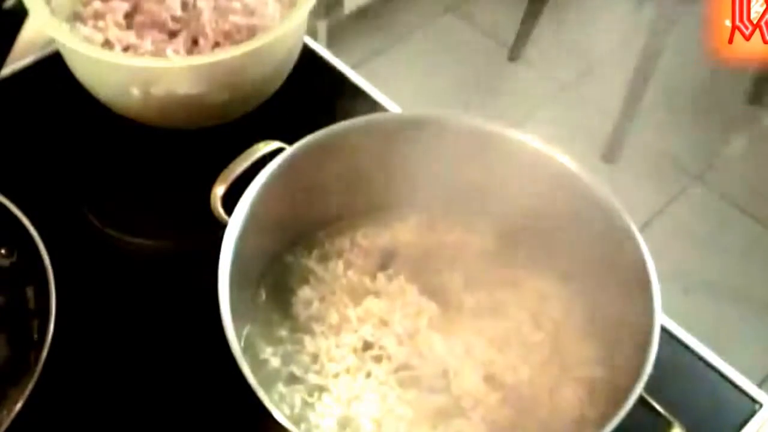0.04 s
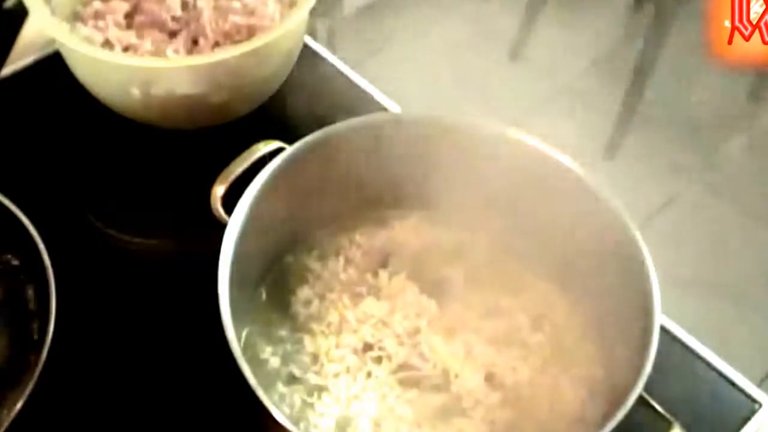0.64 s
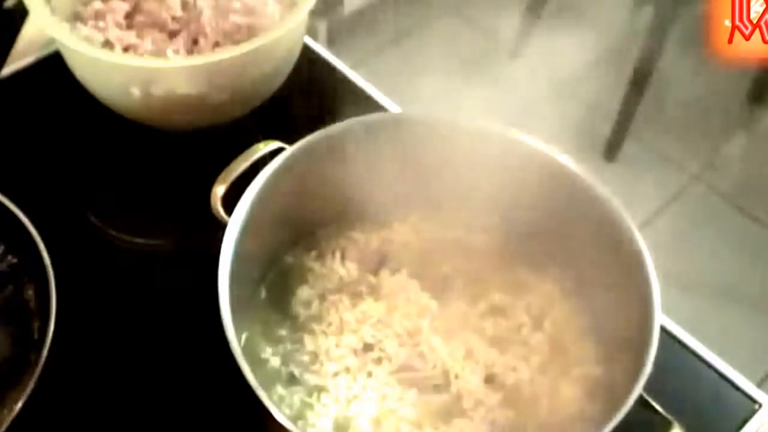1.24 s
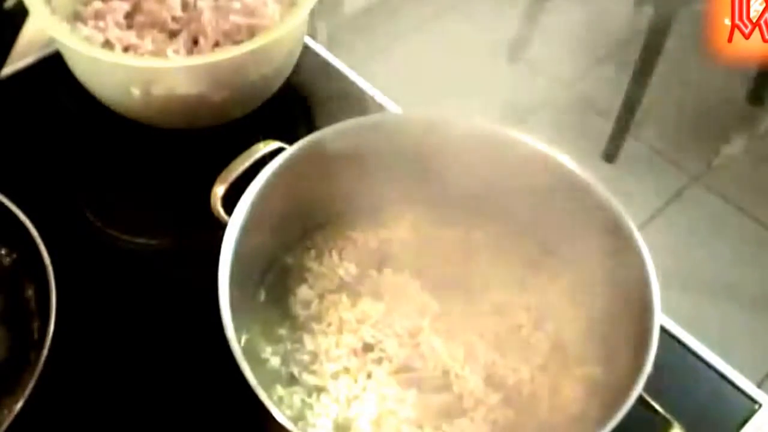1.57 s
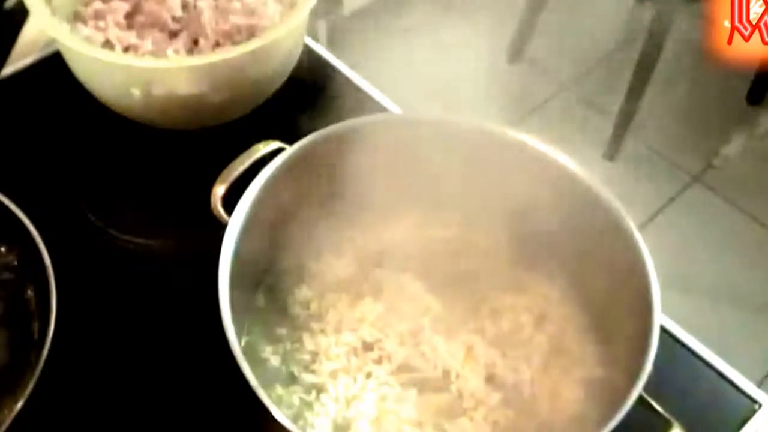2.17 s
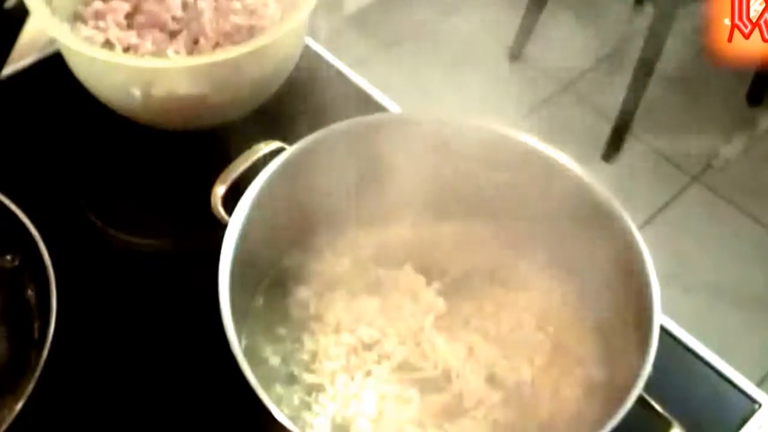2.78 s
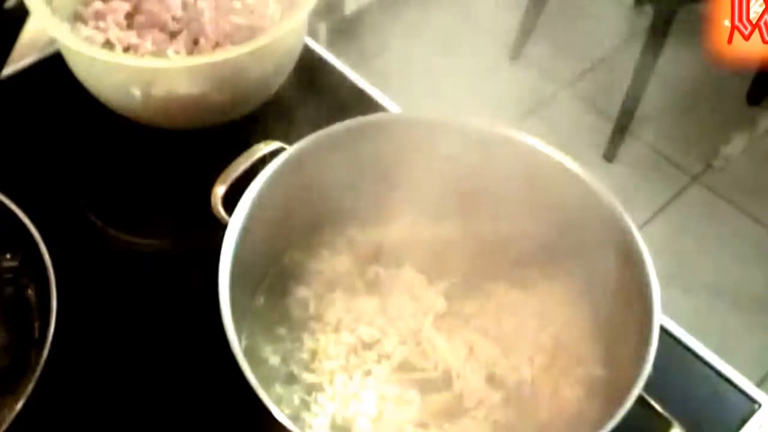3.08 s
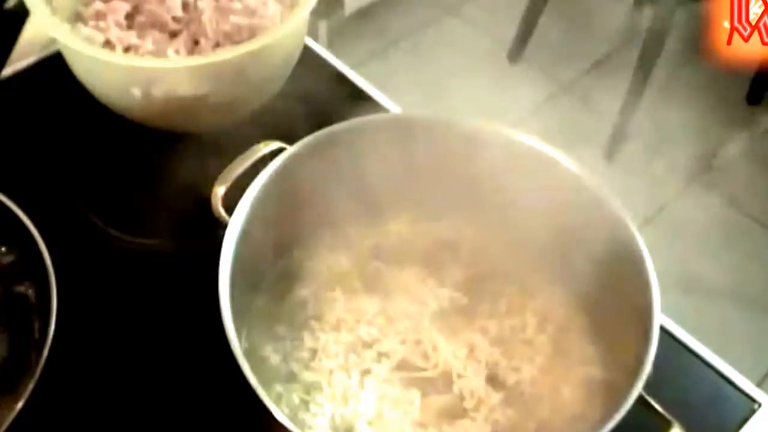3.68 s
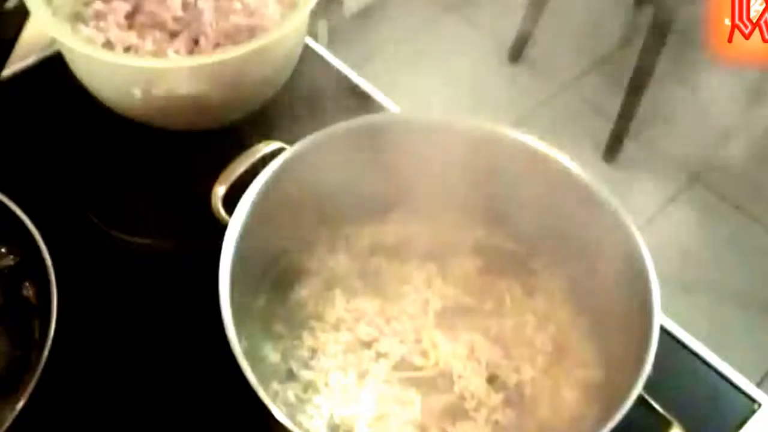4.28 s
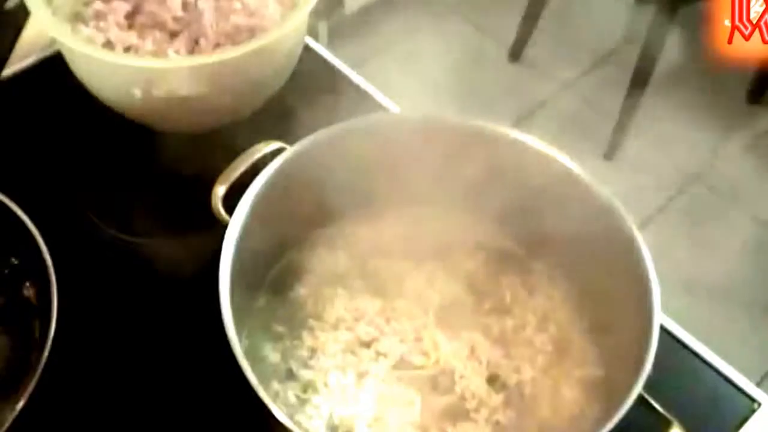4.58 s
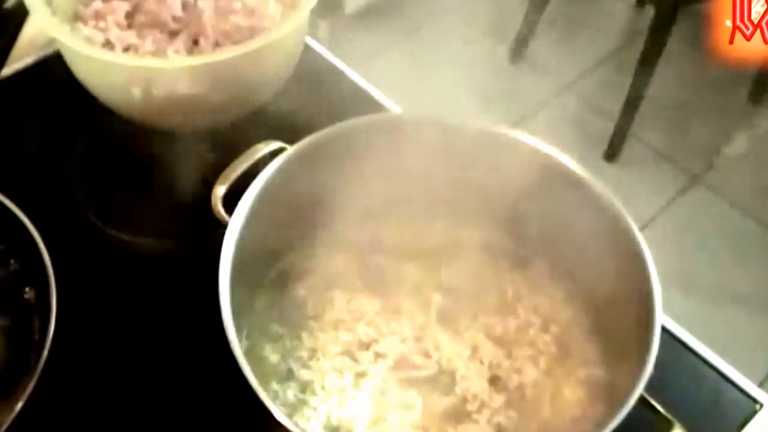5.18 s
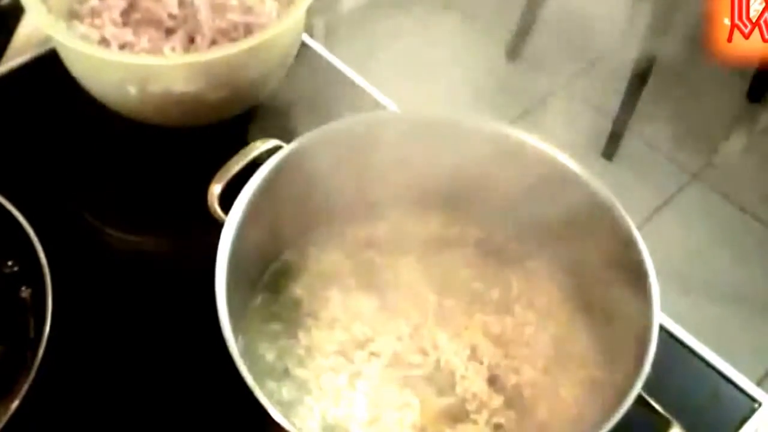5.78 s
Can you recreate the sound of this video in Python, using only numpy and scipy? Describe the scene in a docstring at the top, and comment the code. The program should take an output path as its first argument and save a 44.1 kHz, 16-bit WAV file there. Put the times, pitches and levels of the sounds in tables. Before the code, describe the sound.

Noodle soup simmers in an open steel pot on a kitchen stove, heard from just above the rim for about six seconds. Small bubbles burst continuously over a fine fizz, while larger, short wet pops stand out irregularly and ring slightly inside the pot. The pops are thickest in the first second, cluster again around 2 and 3.2 seconds, and two stronger ones land near 4 seconds. Droplets snap with sharp, bright ticks at about 1.5 and 4.3 seconds, and brief, faint sizzles come off the hot steel, mostly between 1.5 and 2.3 seconds. A low fan-like hum drones underneath throughout. A dull, muffled rush swells softly from about 4.3 to 4.9 seconds and again at 5.5. Very faintly, something ticks like a small clock, thin and high, about three times a second. The bubbling continues to the end.

```python
"""Noodle soup simmers in an open steel pot on a kitchen hob, heard from just above the rim.
Bubbles burst in short chirps that ring in the air of the pot, over a fine fizz of tiny ones.
Droplets snap in a few sharp spits and sizzle off the hot steel. A low hum drones underneath,
a dull rush comes in swells near the end, and something ticks faintly like a small clock."""
import sys
import numpy as np
from scipy import signal
from scipy.fft import rfft, irfft, next_fast_len
from scipy.io import wavfile

SR = 44100
rng = np.random.default_rng(int(sys.argv[2]) if len(sys.argv) > 2 else 0)


def generate_wav(signal):
    """Clip the signal to [-1, 1] and save it as 16-bit WAV at the path in sys.argv[1]."""
    frames = np.transpose(np.atleast_2d(signal))
    scaled = np.clip(frames, -1, 1) * 32767
    pcm = np.round(scaled).astype(np.int16)
    wavfile.write(sys.argv[1], SR, pcm)


N = 261424
POP_CREST_S = .00095  # from the snap of a large bubble's film to its crest

# the big foreground pops: crest t/s, level/dB, f/Hz
POPS = [(0.0213, -0.5, 1580), (0.0495, -3.5, 2930), (0.0783, -8, 2000), (0.174, -12.5, 5430),
        (0.2337, -13.0, 5600), (0.3638, -7, 1890), (0.371, -8, 1960), (0.3984, -6, 1680), (0.418, -6, 3500),
        (0.4251, -6, 1550), (0.4483, -7.5, 2580), (0.4582, -7.5, 1660), (0.4665, -7.5, 2370),
        (0.4993, -7, 2760), (0.5016, -7.5, 1660), (0.5213, -6.5, 1890), (0.5605, -2.5, 1930),
        (0.5825, -6.5, 2410), (0.5863, -10.0, 5600), (0.6165, -4.5, 1900), (0.6522, -8, 2450),
        (0.6637, -2.5, 1830), (0.6769, -8, 1770), (0.6998, -5, 2930), (0.7152, -6, 2250),
        (0.7247, -5.5, 1890), (0.7342, -3.5, 2070), (0.7555, -7.5, 3200), (0.7584, -9.0, 5600),
        (0.7798, -6, 1660), (0.789, -7, 1450), (0.8355, -1.5, 1620), (0.8727, -6, 2760),
        (0.9172, -2.5, 1640), (0.921, -7.5, 2600), (0.9489, -8, 2110), (1.0415, -6.0, 2200),
        (1.0776, -7, 1720), (1.0951, -11.0, 5110), (1.1393, -6, 1660), (1.1957, -6.5, 5600),
        (1.1979, -2.5, 1890), (1.2301, -9.5, 5430), (1.3403, -2.5, 1710), (1.4454, -7.5, 2780),
        (1.4648, -7.5, 1460), (1.7477, -6.5, 2900), (1.7565, -7.5, 1550), (1.7814, -6.5, 5270),
        (1.8625, -6, 1420), (1.8895, -7.5, 2670), (1.9342, -3, 1520), (1.9608, -7, 2600),
        (1.9683, -5.5, 1660), (1.9735, -6.5, 1600), (2.1067, -11.0, 1380), (2.1609, -6, 2670),
        (2.1886, -10.5, 1380), (2.2102, -7.5, 2710), (2.226, -8.0, 3440), (2.2617, -6.5, 2100),
        (2.2797, -7.5, 2540), (2.286, -4, 1290), (2.4998, -4, 2700), (2.5366, -8.5, 3440),
        (2.6937, -8, 2320), (2.7889, -6.5, 2000), (2.9288, -7.5, 3440), (2.9733, -6.5, 1560),
        (3.025, -9.5, 1230), (3.0822, -7, 2330), (3.1058, -7.5, 1530), (3.1209, -10.0, 4530),
        (3.1291, -8, 1310), (3.1727, -3.5, 1870), (3.2003, -3, 1200), (3.212, -7, 1350),
        (3.2269, -3.5, 2560), (3.241, -8, 1400), (3.253, -9, 1150), (3.2745, -6.5, 1480), (3.285, -8, 1750),
        (3.3713, -4.8, 1920), (3.4069, -7.5, 1600), (3.4399, -5.5, 2740), (3.5308, -6.5, 1920),
        (3.5377, -7, 2040), (3.6161, -5.5, 1950), (3.6622, -11.0, 5600), (3.7208, -6.5, 2620),
        (3.7848, -6.5, 2540), (3.8922, -1, 2480), (3.9965, -7, 2390), (4.0118, -9.0, 3890),
        (4.0574, -7, 1730), (4.1076, -9.5, 1380), (4.1166, -8, 2950), (4.1485, -0.3, 1580),
        (4.376, -7.5, 2750), (4.4123, -5.5, 1640), (4.4128, -7, 3140), (4.441, -7, 1700), (4.467, -8, 2850),
        (4.499, -8.5, 2050), (4.6269, -4.5, 1920), (4.6945, -7.5, 3150), (4.6976, -10.5, 1120),
        (4.761, -7, 3380), (4.8237, -4.5, 2000), (4.997, -11, 1900), (5.1673, -5, 2620),
        (5.2624, -7.5, 2800), (5.339, -7, 2900), (5.4096, -4.5, 1450), (5.4205, -6.5, 2500),
        (5.4317, -7.5, 1530), (5.4988, -11, 1220), (5.5722, -8, 2500), (5.6192, -8, 2150),
        (5.6803, -4.5, 1520), (5.709, -8.5, 2450), (5.7582, -10.0, 4670), (5.7886, -5, 2660),
        (5.832, -7.5, 2550), (5.8392, -5.5, 2320), (5.8471, -8, 1460), (5.8973, -8.5, 2390)]
def pops(level_db=-1.0, neighbours=4, spray_db=-12.5, spray_lag_s=.007, spray_hz=2450, octaves=0.8):
    """Large bubbles burst, each at its own spot, and tear open small neighbours in a dry crackle."""
    out = np.zeros((2, N))
    small = [pop(hz) for hz in spray_hz * 2 ** (octaves * np.linspace(-1, 1, 24))]
    for s, db, hz in POPS:
        cluster = np.zeros((1, SR // 20))
        add(cluster, 0, pop(hz)[None])
        kinds = rng.integers(len(small), size=neighbours)
        for kind, lag in zip(kinds, rng.exponential(spray_lag_s, neighbours)):
            add(cluster, 2 * POP_CREST_S + lag, amp(spray_db) * small[kind][None])
        echo = pot_echo(wall_db=-9.5, ring_db=6.0, wall_same=0.44, room_db=-10.0)
        add(out, s - POP_CREST_S, amp(db + level_db) * signal.fftconvolve(cluster, echo, axes=1))
    return out


def pop(hz, crest_s=POP_CREST_S, ring_s=.00062, glide=-.08, snap_db=-8., snap_s=.00035):
    """The film snaps, then the cavity swells, sags in pitch and dies within a few cycles."""
    t = np.arange(SR // 100) / SR
    swell = np.where(t < crest_s, np.sin(np.pi / 2 * t / crest_s), 1 / np.cosh((t - crest_s) / ring_s))
    turns = np.cumsum(hz * (1 + glide * np.tanh(t / crest_s - 1))) / SR + rng.random()
    snap = t / snap_s * np.exp(1 - t / snap_s) * film_noise(1990, 4450)[:len(t)]
    sound = swell * np.sin(2 * np.pi * turns) + amp(snap_db) * np.sqrt(2) * snap / abs(snap).max()
    return signal.lfilter(*signal.butter(5, 6500, fs=SR), sound)


def film_noise(low_hz, high_hz):
    """The rasp of a tearing film: a short band of noise."""
    band = signal.butter(6, [low_hz, high_hz], "band", fs=SR)
    return unit(signal.lfilter(*band, rng.standard_normal(2048)))[256:]


# fader ride for how hard the soup bubbles: t/s, level/dB
BOIL = [(0, -21.5), (0.29, -24), (0.41, -19.5), (0.6, -22), (0.74, -19.5), (0.82, -23), (0.92, -20),
        (1.12, -24), (1.26, -23.5), (1.66, -24), (1.95, -23), (2.07, -26.5), (2.27, -19.5), (2.43, -24),
        (2.85, -23), (3.24, -22), (3.33, -26), (3.47, -19.5), (3.82, -25.5), (4.0, -21.5), (4.33, -23),
        (4.42, -20), (4.56, -27.5), (4.64, -22), (5.05, -25.5), (5.42, -21.5), (5.66, -27.5), (5.93, -26)]
def simmer(plips_db=-6.5, bubbles_db=-1.2, fizz_db=-26, fizz_follow=0.054, fall_db_per_s=0.32):
    """Plips and a bed of mid-sized bubbles ride the boil; the steadier fizz slowly dies down."""
    boil_db = over_time(BOIL)
    stirred = flurry(strength_db=2.5, lag_s=.004)
    plips = swarm(2780, 5710, per_s=220, spread_db=3.5, wall_db=2.5, wall_same=0.92, kinds=14)
    bubbles = swarm(927, 3370, per_s=480, spread_db=2.5, wall_db=-2.5, wall_same=0.37, kinds=24)
    fizz = swarm(3220, 9860, per_s=600, spread_db=3.5, wall_db=-6.0, wall_same=0.45, kinds=24)
    fizz_ride_db = fizz_db + fizz_follow * (boil_db - boil_db.mean()) - fall_db_per_s * np.arange(N) / SR
    body = amp(plips_db) * plips + amp(bubbles_db) * stirred * bubbles
    return amp(boil_db) * body + amp(fizz_ride_db) * stirred ** 0.19 * treble_flicker(fizz)


# EQ on the bed of small bubbles: f/Hz, level/dB
BUBBLE_EQ = [(400, -39), (850, -3), (1100, -3), (1400, -2.5), (2000, 0.5), (2700, -0.5), (3300, -4),
             (4100, -8.5), (5600, -7), (6500, -6), (8000, -15.5), (10800, -48.5), (12000, -46),
             (16000, -51)]
def swarm(low_hz, high_hz, per_s, spread_db, wall_db, wall_same, kinds):
    """Small bubbles of several pitches burst in the pot at random moments and strengths."""
    out = np.zeros((2, N))
    for hz in np.linspace(low_hz, high_hz, kinds):
        moment, size, sign = rng.random((400, 3))[:int(per_s * N / SR / kinds)].T
        strength = amp(spread_db * np.minimum(-np.log(size), 3.5))
        triggers = np.zeros(N)
        triggers[(moment * N).astype(int)] = np.sign(sign - .5) * strength
        chirp = burst(hz, swell_cycles=1.8, glide=0.18)
        echo = pot_echo(wall_db, ring_db=17.0, wall_same=wall_same)
        sound = signal.fftconvolve(chirp[None] / np.linalg.norm(chirp), echo, axes=1)
        out += signal.oaconvolve(triggers[None], sound, axes=1)[:, :N]
    return unit(shaped(out, lambda hz: amp(at_hz(BUBBLE_EQ, hz))))


def burst(hz, swell_cycles, glide, rasp_db=-11.0):
    """A small bubble rings a few raspy cycles, rising in pitch as it tears open."""
    age = np.arange(int(6 * swell_cycles * SR / hz) + 2) * hz / SR / swell_cycles  # 1 at the crest
    swell = age * np.exp(1 - age)
    pitch = hz * (1 + glide * np.tanh(age - 1))
    ring = swell ** 3 * np.sin(2 * np.pi * (np.cumsum(pitch) / SR + rng.random()))
    return ring + amp(rasp_db) * swell * np.resize(film_noise(1420, 5700), len(age))


def flurry(strength_db, lag_s):
    """Each big pop sets off its neighbours a moment later: a gain on the small bubbles."""
    s, db, _ = np.transpose(POPS)
    jolts = np.bincount((s * SR).astype(int), amp(db + strength_db) ** 2, N)
    age = np.arange(SR // 5) / SR / lag_s
    return unit(np.sqrt(1 + signal.oaconvolve(jolts, age * np.exp(1 - age))[:N]))


def treble_flicker(hiss, above_hz=6730.0, depth_db=6.5, rate_hz=17.0, level_db=-0.5):
    """A random level flicker on the hiss above about 6.7 kHz."""
    top = shaped(hiss, lambda hz: 1 - 1 / (1 + (hz / above_hz) ** 20))
    return hiss - top + amp(level_db) * unit(amp(depth_db * waver(rate_hz))) * top


# ringing modes of the air in the pot: f/Hz, t60/s, level/dB
POT_MODES = [(962.6, 0.1, -10), (1118, 0.11, -36), (1398, 0.054, -10.5), (1695, 0.047, -12),
             (1745, 0.24, -17), (1836, 0.079, -15), (2118, 0.047, -17), (2380, 0.026, -17),
             (2627, 0.046, -12), (2840, 0.022, -16.5), (3160, 0.22, -27)]
def pot_echo(wall_db, ring_db, wall_t60=0.053, wall_same=0.61, room_db=-6.0, room_t60=0.4, bounce=0.32):
    """Stereo impulse response from one spot on the soup: direct sound, steel walls, pot air, kitchen."""
    t = np.arange(SR // 5) / SR
    taps = rng.standard_normal((5, len(t))) * (rng.random((5, len(t))) < .25)
    wall_taps = np.sqrt(wall_same) * taps[0] + np.sqrt(1 - wall_same) * taps[1:3]  # centre plus width
    walls = wall_taps * amp(-60 * t / wall_t60) * (t > .0018)
    room = taps[3:] * amp(-60 * t / room_t60) * (t > .008)
    echo = (amp(wall_db) * unit(walls) + amp(room_db) * unit(room)) / np.sqrt(len(t))
    for hz, t60, db in POT_MODES:  # each spot drives the modes by its own amounts
        ring = amp(-60 * t / t60) * np.sin(2 * np.pi * (hz * t + rng.random()))
        echo += amp(ring_db + db) * rng.uniform(0.51, 2.15) * ring * 2 * np.log(1000) / (t60 * SR)
    echo[:, 0] += 1
    echo[:, int(rng.uniform(.0018, .0028) * SR)] += bounce  # the round wall focuses one clear reflection
    return echo


# sharp droplet accents: crest t/s, level/dB, f/Hz
SPITS = [(1.544, 4, 8400), (2.0805, -23, 6500), (4.2462, -6, 10100), (4.253, 1, 9550)]
def spits(level_db=-13.0, swell_cycles=3.1, glide=0.057):
    """Tiny droplets snap with a bright tick that echoes in the pot."""
    out = np.zeros((2, N))
    for s, db, hz in SPITS:
        snap = burst(hz, swell_cycles, glide)
        echo = pot_echo(wall_db=-7.0, ring_db=-5., room_db=-5.5)
        add(out, s - swell_cycles / hz, amp(db + level_db) * signal.fftconvolve(snap[None], echo, axes=1))
    return out


# brief sizzles: peak t/s, level/dB, centre f/Hz, rise and fade time constant/s
SIZZLES = [(1.08, -44, 9600, 0.067), (1.59, -37, 9150, 0.16), (1.78, -28, 4840, 0.011),
           (1.84, -44, 9800, 0.045), (2.083, -26.5, 6600, 0.029), (2.286, -27, 4400, 0.037),
           (2.76, -47.5, 8600, 0.3), (3.38, -42, 9900, 0.036), (4.252, -30, 9000, 0.036),
           (5.87, -42, 8400, 0.053)]
def sizzles(width_hz=1800.0, flutter_db=3.0, flutter_hz=35., per_s=2100.0, spread_db=-1.5):
    """Droplets boil off the hot steel in short sprays of tiny snaps."""
    t, out = np.arange(N) / SR, np.zeros((2, N))
    for s, db, centre_hz, fade in SIZZLES:
        triggers = rng.random(N) < per_s / SR
        strength = amp(spread_db * np.minimum(rng.exponential(1, N), 3))
        snaps = triggers * strength * rng.standard_normal((2, N))
        spray = shaped(snaps, lambda hz: np.exp(-((hz - centre_hz) / width_hz) ** 4))
        out += amp(db) * np.exp(-abs(t - s) / fade) * unit(spray * amp(flutter_db * waver(flutter_hz)))
    return out


# broad body of the hum: f/Hz, level/dB
HUM_BODY = [(8, -12), (35, -5), (85, -4.5), (170, -9), (205, -1), (260, 2.5), (310, -3.5), (405, -1),
            (500, -11), (650, -11.5), (850, -16), (1100, -15.5), (1500, -26), (4000, -22), (9000, -57),
            (14000, -75)]
# resonant peaks of the hum: f/Hz, width/Hz, level/dB
HUM_PEAKS = [(59.8, 9.6, 0.5), (107.3, 11.8, 6), (138.2, 8.4, 12.5), (157.6, 37, 5.5), (179, 10, 5),
             (286, 24, -7.5), (329.7, 8.1, 4.5), (377.6, 3.7, 3.5), (581, 14.5, -5.5), (717, 1.9, -23),
             (761, 13.5, -7)]
# fader ride on the hum: t/s, level/dB
HUM_RIDE = [(0, -17.5), (.75, -18.5), (1.06, -16.5), (1.3, -18), (2.5, -18.5), (3.4, -17.5), (4.75, -17),
            (5.15, -18), (5.4, -17), (5.93, -18)]
def hum(waver_db=0.8, waver_hz=6.4):
    """A fan-like drone, wavering slightly: turbulent air in a few low resonances."""
    def gain(hz):
        peaks = sum(amp(db) ** 2 / (1 + ((hz - f) / width * 1.64) ** 2) ** 2
                    for f, width, db in HUM_PEAKS)
        return np.sqrt(amp(at_hz(HUM_BODY, hz)) ** 2 + peaks)
    return amp(over_time(HUM_RIDE) + waver_db * waver(waver_hz)) * low_noise(gain)


# dark EQ on the rush: f/Hz, level/dB
RUSH_EQ = [(60, -41), (220, 10), (400, 10), (520, 7), (750, 5.5), (880, -2), (1130, 3), (1300, 3.5),
           (1600, -17), (4000, -61), (12000, -72)]
# swells of the rush: peak t/s, level/dB, rise and fade time constant/s, hollow f/Hz
RUSH_SWELLS = [(4.32, -20, 0.064, 724), (4.48, -24, 0.1, 707), (4.70, -16.8, 0.035, 710),
               (4.754, -16, 0.063, 740), (4.89, -20.5, 0.055, 726), (5.495, -16.5, 0.064, 620)]
def rush(roll_db=2.5, roll_hz=30., hollow_db=4.0, hollow_width_hz=84.0):
    """A dull, rolling rush of noise in a few swells, each with a hollow resonance."""
    t, out = np.arange(N) / SR, np.zeros((2, N))
    noise = low_noise(lambda hz: amp(at_hz(RUSH_EQ, hz)))
    for s, db, fade, hz in RUSH_SWELLS:
        body = np.roll(noise, rng.integers(N), axis=1)
        hollow = signal.lfilter(*signal.iirpeak(hz, hz / hollow_width_hz, fs=SR), body)
        out += amp(db) * np.exp(-abs(t - s) / fade) * unit(body + amp(hollow_db) * hollow)
    return out * amp(roll_db * waver(roll_hz))


# stereo image of the hum and the rush: f/Hz, left-right correlation/0-1
CORRELATION = [(30, 0.92), (130, 1), (300, 0.99), (600, 0.91), (1200, 0.98), (4000, 0.23)]
def low_noise(gain):
    """Coloured stereo noise, nearly mono in the bass and wide on top."""
    left, other = rng.standard_normal((2, N))
    same = lambda hz: np.clip(at_hz(CORRELATION, hz), 0, 1)
    right = shaped(left, same) + shaped(other, lambda hz: np.sqrt(1 - same(hz) ** 2))
    return unit(shaped(np.array([left, right]), gain))


# tick-tock beats: t/s, level/dB
TICKS = [(-0.04, -38), (0.272, -44), (0.588, -42), (0.905, -43), (1.222, -37), (1.538, -51), (1.85, -36.5),
         (2.16, -42), (2.482, -38.5), (2.78, -44), (3.102, -40), (3.42, -40), (3.75, -35.5), (4.065, -44),
         (4.387, -36.5), (4.71, -43.5), (5.019, -38), (5.325, -42), (5.652, -41)]
# thin ring of the ticking metal: f/Hz, width/Hz, level/dB
TICK_RING = [(10020, 310, 2.5), (10830, 600, 0), (14000, 900, -14.5), (15400, 450, -13)]
# EQ on the click of each beat: f/Hz, level/dB
CLICK_EQ = [(3000, -7), (7000, -12), (11000, -3), (13000, -6), (16000, -14)]
def ticking(rise_s=0.026, t60_s=0.33, click_db=-10., click_s=.004, flutter_db=1.0, flutter_hz=18.0):
    """A faint tick-tock: each soft click leaves a thin ring whose partials flutter independently."""
    t = np.arange(N) / SR
    ring_level, click_level, ring = np.zeros((3, N))
    for s, db in TICKS:
        age = np.maximum(t - s + rise_s / 2, 0)
        ring_level += amp(db - 60 * age / t60_s) * np.minimum(age / rise_s, 1)
        click_level += amp(db + click_db) * np.exp(-abs(t - s) / click_s) * (t > s)
    for f, width, db in TICK_RING:
        flutter = amp(db + flutter_db * waver(flutter_hz))
        ring += flutter * shaped(rng.standard_normal(N), lambda hz: 1 / (1 + (2 * (hz - f) / width) ** 4))
    click = shaped(rng.standard_normal(N), lambda hz: amp(at_hz(CLICK_EQ, hz)))
    left = ring_level * unit(ring) + click_level * unit(click)
    right = shaped(left, lambda hz: np.exp(-2j * np.pi * hz * 1.3e-5))  # 13 us late: just off centre
    return np.array([left, right])


def amp(db):
    """Decibels to gain."""
    return 10 ** (np.asarray(db) / 20)


def unit(x):
    """Scales to an rms of 1."""
    return x / np.sqrt(np.mean(x ** 2) + 1e-20)


def at_hz(points, hz):
    """Reads a table along a log-frequency axis."""
    f, value = np.transpose(points)
    return np.interp(np.log(hz + 1), np.log(f + 1), value)


def over_time(points):
    """Reads a fader ride at every sample."""
    return np.interp(np.arange(N) / SR, *np.transpose(points))


def add(mix, s, sound):
    """Mixes a sound in at time s."""
    part = mix[:, max(round(s * SR), 0):][:, :sound.shape[1]]
    part += sound[:, :part.shape[1]]


def shaped(x, gain):
    """Filters x by a gain that is a function of frequency."""
    size = next_fast_len(N + 4096)
    return irfft(rfft(x, size) * gain(np.fft.rfftfreq(size, 1 / SR)), size)[..., :N]


def waver(rate_hz):
    """Slow random modulation with an rms of 1."""
    return unit(shaped(rng.standard_normal(N), lambda hz: np.exp(-hz / rate_hz)))


def scene():
    """The simmering pot up front, the kitchen sounds behind it."""
    return pops() + simmer() + spits() + sizzles() + hum() + rush() + ticking()


# phase across the microphone pair: f/Hz, lead of the left/rad
MIC_PHASE = [(100, 0), (900, 0), (1700, 0.38), (3000, 1.15), (4500, 1), (5200, 1.5), (5900, 3), (9000, 4.5),
             (10500, 6.5)]
# balance of the pair: f/Hz, left minus right level/dB
MIC_BALANCE = [(100, 1), (600, 0.1), (1900, 1.5), (3200, 1.5), (3900, -2), (4800, -1), (5700, -6.5),
               (6800, 0), (10700, 2)]
def record(dry, high_cut_hz=15800):
    """Two microphones differ in phase and level; peaks clip at full scale before a steep high cut."""
    def mic_pair(hz):
        half = amp(at_hz(MIC_BALANCE, hz) / 2)
        return np.array([half, np.exp(-1j * at_hz(MIC_PHASE, hz)) / half])
    heard = np.clip(shaped(dry, mic_pair), -1, 1)
    high_cut = signal.firwin(511, high_cut_hz, window=("kaiser", 9), fs=SR)
    return signal.oaconvolve(heard, high_cut[None], "same")


dry = scene()
out = record(dry)
generate_wav(out)
```